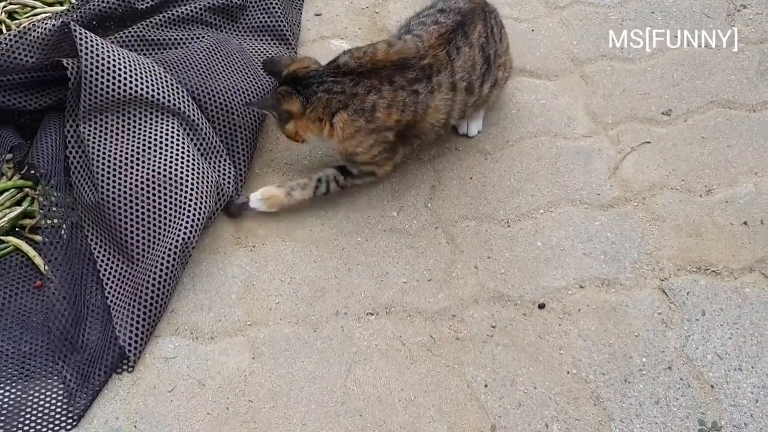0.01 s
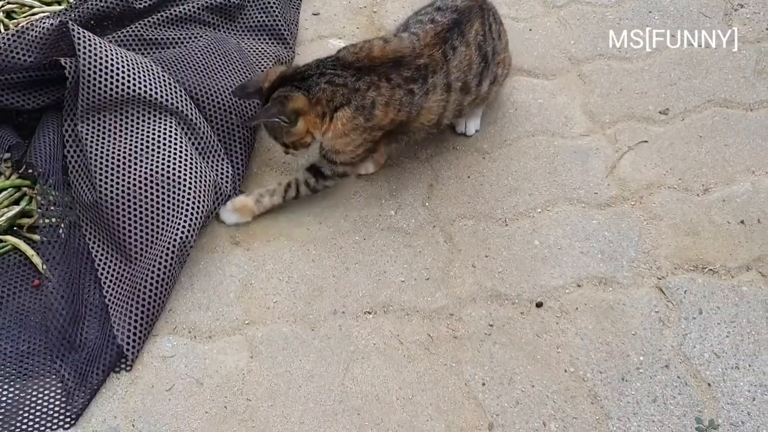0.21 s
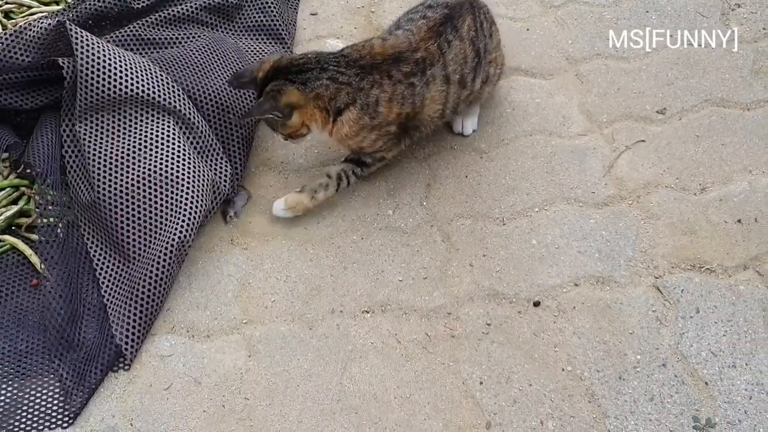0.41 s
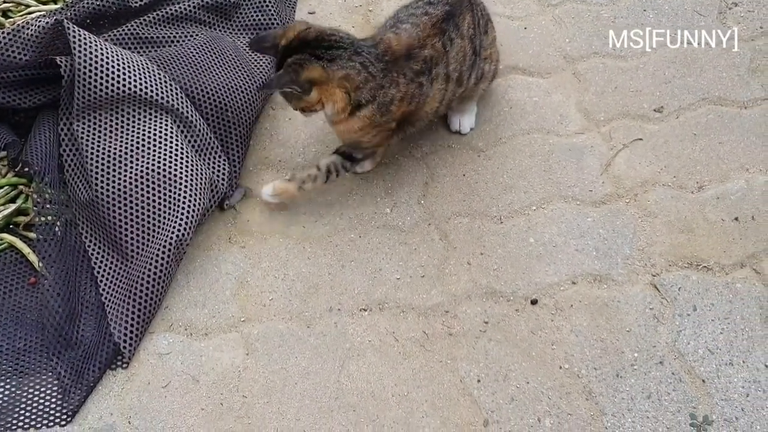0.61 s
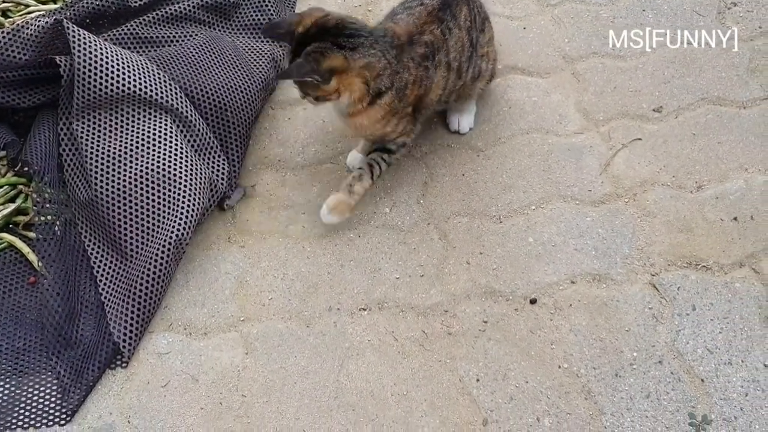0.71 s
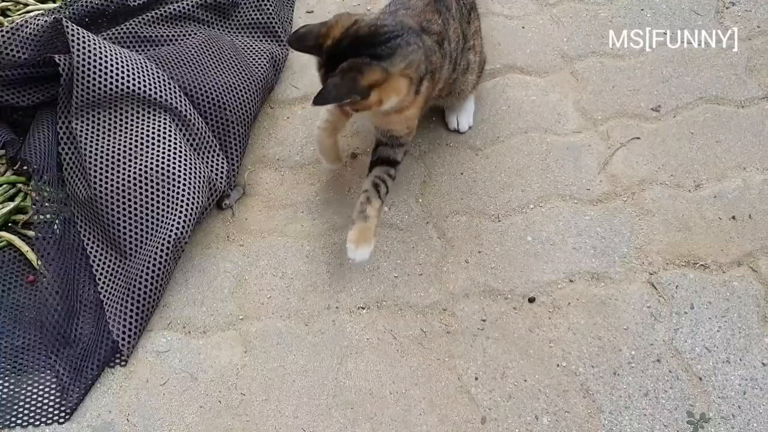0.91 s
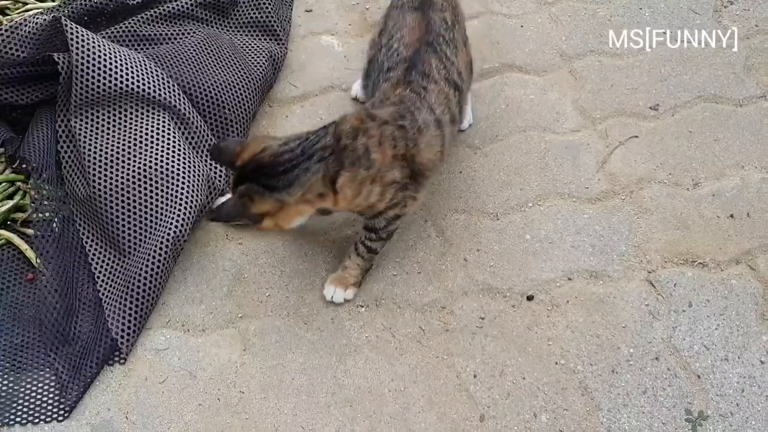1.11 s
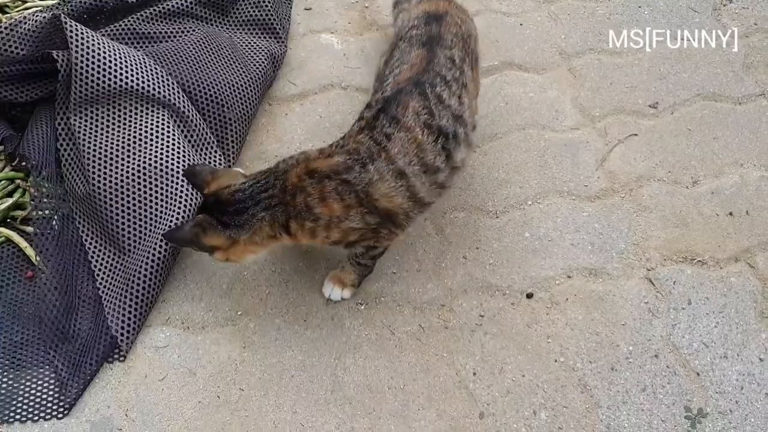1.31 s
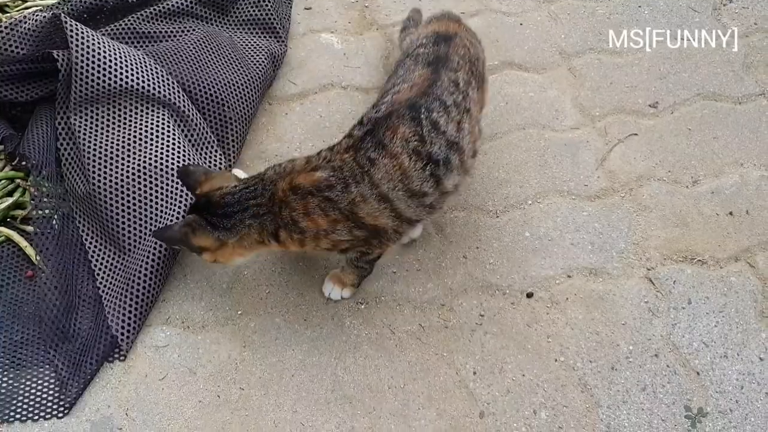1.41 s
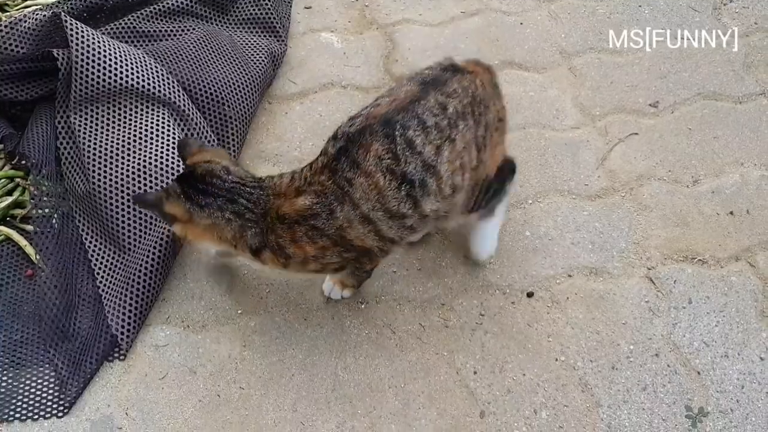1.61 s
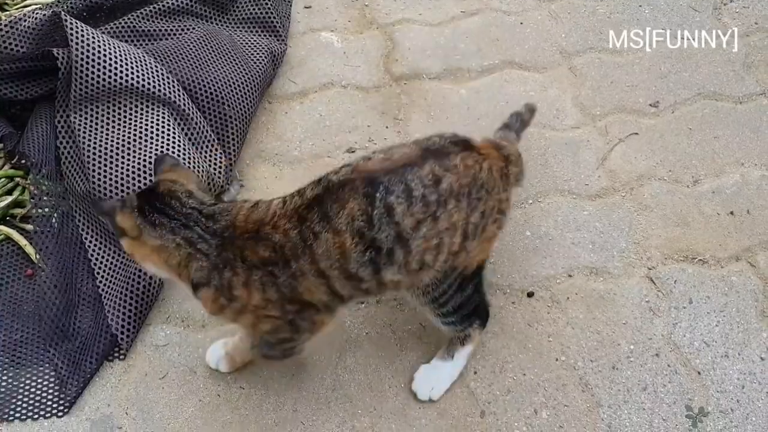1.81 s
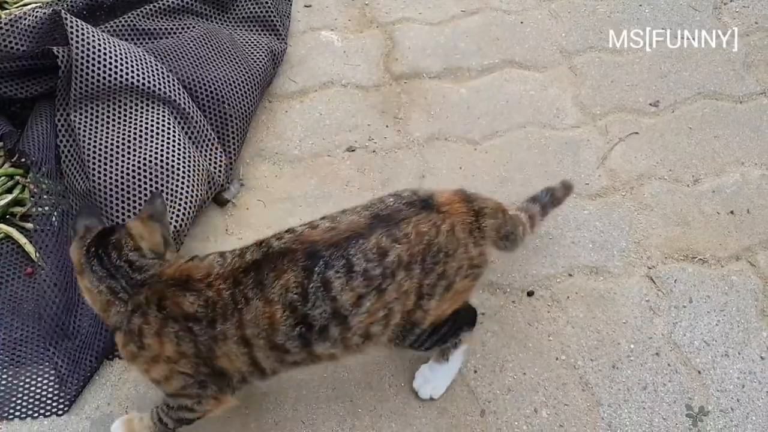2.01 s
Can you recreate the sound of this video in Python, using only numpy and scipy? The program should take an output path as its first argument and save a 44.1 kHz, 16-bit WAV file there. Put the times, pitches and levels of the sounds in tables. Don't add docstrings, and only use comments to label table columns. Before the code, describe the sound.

A mouse gives thin, extremely high trilling squeaks up close on a paved yard, distant traffic behind

```python
import sys
import numpy as np
from scipy import signal
from scipy.fft import rfft, irfft, next_fast_len
from scipy.io import wavfile
from scipy.ndimage import uniform_filter1d, map_coordinates

SR = 44100
rng = np.random.default_rng(int(sys.argv[2]) if len(sys.argv) > 2 else 0)


def store_wav(level_fs):
    pcm = np.round(np.clip(np.atleast_2d(level_fs), -1, 1) * 32767)
    wavfile.write(sys.argv[1], SR, pcm.T.astype(np.int16))


def to_linear_factor(level_db):
    exponent = np.asarray(level_db, float) / 20
    return 10 ** exponent


N = 92610
T = np.arange(N) / SR

# pitch_hz, level_db
RUMBLE_SPECTRUM = [(18, -38.5), (30, -11.5), (53, -2.5), (69, -2.5), (108, -9.5), (204, -4), (337, -18),
                   (377, -32), (600, -23.5), (780, -51.5), (1320, -120)]
# pitch_hz, level_db
AIR_SPECTRUM = [(240, -28), (400, -10), (518, -14.5), (768, -12.5), (2060, -17.5), (3450, -16), (3890, -16),
                (6510, -19), (15000, -19)]
# pitch_hz, likeness_0_to_1
SIDE_LIKENESS = [(30, .92), (100, 0.79), (180, 0.73), (350, 0.4), (800, 0), (8000, 0.055)]
# time_s, level_db
WIND_GUSTS = [(0.0, -54), (0.21, -42.5), (0.37, -46), (0.43, -36.5), (0.46, -48), (0.59, -38), (0.74, -62),
              (0.81, -39.5), (0.92, -58), (0.99, -44.5), (1.11, -55), (1.16, -46.5), (1.35, -55),
              (1.39, -40.5), (1.46, -39), (1.98, -46.5), (2.04, -37), (2.1, -53)]
# start_s, length_s, level_db, start_pitch_hz, end_pitch_hz
BIRD_CHIRPS = [
    (-.03, .22, -59, 3900, 4100),
    (.38, .12, -60, 3900, 4150),
    (.46, .14, -54.5, 3820, 3850),
    (.52, .07, -59, 4150, 4050),
    (.54, .1, -58, 4300, 4500),
    (.86, .135, -57.5, 3530, 3510),
    (1.85, .08, -60, 4200, 4200),
    (1.7, .13, -63, 4000, 4150),
    (2.0, .1, -61, 4050, 4000),
]
# start_s, length_s, level_db
BREATH_PUFFS = [
    (0.177, 0.046, -33.5),
    (.194, 0.0043, -29.5),
    (0.5405, 0.003, -31.5),
    (0.543, 0.0578, -41.5),
    (1.369, 0.064, -38.5),
    (1.405, 0.011, -41.5),
]
# pitch_hz, level_db
PUFF_SPECTRUM = [(3000, -31), (9000, -19.5), (11000, -1.5), (14000, 1.5), (15500, -17)]
# time_s, left_peak_db, right_peak_db, pitch_hz
FIRST_SQUEAKS = [
    [(.2005, -36, -34, 11500), (.202, -11, -20, 12050), (.2085, -12, -18, 12150), (.2105, -13, -12, 13300),
     (.22, -11, -10, 13500), (.234, -6, -7, 12950), (.24, -3.5, -7, 12880), (.242, 1.2, -6.5, 12930),
     (.258, .6, -4.5, 12660), (.271, -5, -6.5, 12620), (.2845, -8, -8, 13550), (.2905, -14, -14, 13050),
     (.293, -25, -24, 13300), (.3, -22, -22, 12350), (.3035, -36, -34, 12600)],
    [(.549, -34, -38, 11700), (.5505, -19, -23, 12400), (.552, -20, -24, 12650), (.555, -29, -33, 11900),
     (.557, -38, -35, 12700), (.559, -28, -23, 13300), (.5645, -24, -32, 12000)],
    [(.565, -34, -34, 14450), (.567, -15, -17, 14300), (.584, -16, -19, 14200), (.596, -14, -20, 13950),
     (.603, -13, -24, 13950), (.607, -13, -21, 14050), (.611, -12, -18, 13350), (.615, -9.5, -16, 13330),
     (.633, -13, -21, 13150), (.636, -28, -31, 13200), (.64, -21, -28, 13500), (.645, -32, -36, 13500),
     (.652, -36, -39, 13450)],
]
# time_s, left_peak_db, right_peak_db, pitch_hz
LAST_SQUEAKS = [
    [(1.371, -40, -42, 11900), (1.375, -16, -27, 11750), (1.381, -23, -29, 12000),
     (1.3865, -20, -27, 12100), (1.39, -30, -31, 10900), (1.392, -17, -27, 11800), (1.396, -23, -27, 12000),
     (1.3985, -32, -30, 11800), (1.4012, -10, -14, 12450), (1.404, -22, -22, 12200)],
    [(1.4035, -30, -26, 12100), (1.405, -14, -12, 12100), (1.412, -17, -20, 12350), (1.42, -20, -27, 11900),
     (1.423, -33, -34, 11300), (1.429, -34, -35, 11300)],
    [(1.4315, -36, -40, 11550), (1.434, -21, -36, 11500), (1.444, -18, -33, 11550),
     (1.454, -18, -38, 11570), (1.4635, -19, -32, 11850), (1.467, -20, -26, 13150),
     (1.4735, -17, -20, 12650), (1.4755, -27, -28, 13200), (1.48, -24, -25, 12750),
     (1.484, -40, -41, 12700)],
    [(1.4, -22, -24, 13900), (1.41, -34, -36, 13700)],
]
# (dip_db softens each pitch top, or each pitch low if negative)
SQUEAK_TRILLS = [
    (.2635, 118, 60, .6, .25),
    (.555, 120, 60, 1, -.6),
    (.6155, 119, 260, 7, 1.3),
    (1.3755, 120, 60, 7, 1.7),
    (1.4075, 120, 90, 3, -.8),
    (1.4465, 119, 210, -6, 1.3),
    (1.4, 300, 150, 6, 1.1),
]
# time_s, level_db
PAW_TAPS = [
    (0.207, -30),
    (.553, -23.5),
]
# start_s, length_s, level_db, pitch_hz
SOFT_HOOT = (.868, .08, -52, 380)
# start_s, length_s, level_db, top_pitch_hz, tilt_db_per_order
FAR_CALLS = [
    (1.057, 0.145, -49, 326.2, -2),
    (1.225, 0.065, -60, 322, 0),
    (1.875, .195, -47.5, 318, 3),
]
# multiple_of_pitch, level_db
CALL_OVERTONES = [(3, -22), (4, -7.5), (5, 0), (6, -13), (7, -22)]
# pitch_hz, level_db
RATTLE_SPECTRUM = [(100, 1), (800, 2), (3000, -2.5), (10000, -3), (11500, -30)]
# start_s, length_s, centre_hz, width_hz
BAND_GAPS = [(.275, .04, 11200, 1300), (.33, .12, 2920, 70), (.49, .03, 2980, 150), (.55, .085, 5100, 600),
             (.55, .1, 3220, 170), (.55, .035, 2750, 200), (.55, .03, 6000, 700), (.575, .05, 7350, 250),
             (.81, .07, 2800, 100), (.885, .03, 4000, 250), (.935, .075, 1620, 130), (1.09, .03, 6050, 250),
             (1.385, .045, 5800, 350), (1.385, .04, 5250, 250), (1.385, .04, 4050, 250),
             (1.385, .05, 3250, 250), (1.435, .06, 2950, 400), (1.45, .065, 5050, 450),
             (1.46, .035, 3500, 250), (1.505, .035, 5450, 500), (1.5, .045, 1600, 170)]


def unit(x):
    return x / np.sqrt(np.mean(x ** 2) + 1e-20)


def along(points, hz):
    f, v = np.transpose(points)
    return np.interp(np.log(hz + 1), np.log(f + 1), v)


def wobble(rate):
    knots = rng.standard_normal(int(N * rate / SR) + 4)
    return map_coordinates(knots, [T * rate])


def filtered(x, response):
    m = next_fast_len(N + 8192)
    return irfft(rfft(x, m) * response(np.fft.rfftfreq(m, 1 / SR)), m)[..., :N]


def swell(start, length, edge):
    u = (T - start) / length
    return np.sin(np.pi / 2 * np.clip(np.minimum(u, 1 - u) / edge, 0, 1)) ** 2


def tone(hz):
    return np.sqrt(2) * np.sin(2 * np.pi * np.cumsum(hz) / SR)


def sides(x, pan_db):
    left = 1 / (1 + to_linear_factor(-pan_db))
    return 2 * x * np.array([left + 0 * x, 1 - left + 0 * x])


def echoes(x, t60):
    t = T[:SR // 2]
    build_up = 1 - np.exp(-t / 0.0025)
    tail = rng.standard_normal((2, len(t))) * to_linear_factor(-60 * t / t60) * build_up
    return signal.fftconvolve(x[None], tail / np.linalg.norm(tail[0]), axes=1)[:, :N]


def rush(spectrum, patchy_db):
    z = signal.stft(rng.standard_normal((2, N)), nperseg=512)[2]
    field = rng.standard_normal(z.shape[1:])
    field = uniform_filter1d(field, size=6, axis=0)
    field = uniform_filter1d(field, size=14, axis=1)
    pair = signal.istft(z * to_linear_factor(patchy_db * unit(field)), nperseg=512)[1][:, :N]

    def mid_and_side(hz):
        turn = np.arccos(np.clip(along(SIDE_LIKENESS, hz), -1, 1)) / 2
        return to_linear_factor(along(spectrum, hz)) * [np.cos(turn), np.sin(turn)]

    mid, side = filtered(pair, mid_and_side)
    return np.array([mid + side, mid - side]) / np.std(mid)


def narrow_noise(centre_hz, width_hz):
    noise = rng.standard_normal(N)
    return unit(filtered(noise, lambda hz: 1 / (1 + ((hz - centre_hz) / width_hz) ** 2)))


def background():
    gust_db = np.interp(T, *np.transpose(WIND_GUSTS))
    drone = to_linear_factor(-1 + gust_db) * sides(narrow_noise(68.2, 18), 0.91)
    hum = to_linear_factor(-56) * narrow_noise(202, 20)
    rumble_db = -44 + 0.36 * (gust_db - gust_db.mean()) + 0.63 * wobble(12.04)
    rumble = to_linear_factor(rumble_db) * rush(RUMBLE_SPECTRUM, patchy_db=2.5)
    rumble = rumble * to_linear_factor([[.6], [-.6]])
    air = to_linear_factor(-51.5 + .3 * wobble(0.71)) * rush(AIR_SPECTRUM, patchy_db=.8)
    return hum + rumble + drone + air


def birds():
    x = np.zeros(N)
    for s, length, db, start_hz, end_hz in BIRD_CHIRPS:
        glide = np.interp(T, [s, s + length], [start_hz, end_hz])
        chirp = tone(glide + 60 * wobble(150))
        flutter = to_linear_factor(3 * wobble(80))
        x += to_linear_factor(db) * swell(s, length, .3) * chirp * flutter
    return .8 * sides(x, 2) + .6 * echoes(x, .25)


def squeak(rows, trill):
    low_s, rate, depth_hz, dip_db, lead = trill
    s, *cols = np.transpose(rows)
    left_db, right_db, pitch_hz = [uniform_filter1d(np.interp(T, s, c), size=45) for c in cols]
    turn = 2 * np.pi * rate * (T - low_s)
    depth = depth_hz * np.where(T > s[0] + .03, 1.45, 1)
    jitter_hz = 20 * wobble(350)
    phase = 2 * np.pi * np.cumsum(pitch_hz - depth * np.cos(turn) + jitter_hz) / SR
    lead = lead + .15 * wobble(100)
    whistle = np.sin([phase + lead / 2, phase - lead / 2])
    dip = abs(dip_db) * np.maximum(-np.sign(dip_db) * np.cos(turn), 0) ** 3
    fade = swell(s[0] - .001, s[-1] - s[0] + 0.0022, 0.047)
    size = fade * to_linear_factor(np.array([left_db, right_db]) - dip)
    flutter = to_linear_factor(.25 * np.array([wobble(250), wobble(250)]))
    breath = to_linear_factor(-34) * wobble(2200)
    return size * whistle * (flutter + breath)


def puffs():
    noise = rng.standard_normal((2, N))
    hiss = unit(filtered(noise, lambda hz: to_linear_factor(along(PUFF_SPECTRUM, hz))))
    size = sum(to_linear_factor(db) * swell(s, length, 0.14) for s, length, db in BREATH_PUFFS)
    return hiss * to_linear_factor(3.75 * wobble(500)) * size


def mouse():
    out = puffs()
    for rows, trill in zip(FIRST_SQUEAKS + LAST_SQUEAKS, SQUEAK_TRILLS):
        out += squeak(rows, trill)
    return out + to_linear_factor(-34) * echoes(out.mean(0), .1)


def taps():
    x = np.zeros(N)
    t = T[:SR // 20]
    for s, db in PAW_TAPS:
        push = np.sin(2 * np.pi * 110 * t) * to_linear_factor(-60 * t / 0.037)
        tick = 0.34 * rng.standard_normal(len(t)) * to_linear_factor(-60 * t / 0.0028)
        x[round(s * SR):][:len(t)] += to_linear_factor(db) * (push + tick)
    return sides(x, 1)


def far_calls():
    s, length, db, hz = SOFT_HOOT
    x = to_linear_factor(db) * swell(s, length, 0.092) * tone(hz + 6 * wobble(30.2))
    for s, length, db, top_hz, tilt_db in FAR_CALLS:
        u = np.clip((T - s) / length, 0, 1)
        arch = 1 - .13 * (2 * u - 1) ** 4
        pitch = top_hz * arch * (1 + 0.0045 * wobble(60))
        voice = np.zeros(N)
        for k, level in CALL_OVERTONES:
            roughness = 1 + .2 * wobble(90) + .3 * wobble(400)
            voice += to_linear_factor(level + tilt_db * (k - 5)) * tone(k * pitch) * roughness
        x += to_linear_factor(db) * swell(s, length, 0.15) * (.75 + .4 * np.sin(np.pi * u)) * voice
    direct = np.array([np.roll(x, 8), x])
    return .8 * direct + to_linear_factor(-12) * echoes(x, .4)


def starved(x, loudness):
    hz, t, z = signal.stft(x, SR, nperseg=1024)
    busy = np.interp(t, T, loudness.mean(0))
    share = np.where((busy > .01) & (busy < .12), .12, .015)
    lot = rng.random((len(hz), len(t)))
    lot = lot[np.arange(len(hz)) // 6][:, np.arange(len(t)) // 4]
    middle = (hz > 1200) & (hz < 6500)
    dropped = (lot < share) & middle[:, None]
    x = signal.istft(z * ~dropped, SR, nperseg=1024)[1][:, :N]
    for s, length, centre, width in BAND_GAPS:
        band = filtered(x, lambda hz: np.abs(hz - centre) < .6 * width)
        x = x - swell(s - .008, length + .016, .12) * band
    return x


def scene():
    return background() + birds() + mouse() + taps() + far_calls()


def low_pass(x):
    return signal.sosfilt(signal.butter(12, 15480, fs=SR, output="sos"), x)


def record(dry):
    treble = filtered(dry, lambda hz: hz > 10000)
    loudness = np.sqrt(np.abs(uniform_filter1d(treble ** 2, size=900, axis=1)))
    noisy = dry + to_linear_factor(-39.5) * loudness ** 0.52 * rush(RATTLE_SPECTRUM, patchy_db=2.5)
    top, hardness = .92, 70
    clipped = noisy / (1 + np.abs(noisy / top) ** hardness) ** (1 / hardness)

    def pass_band(hz):
        low_cut = np.clip(hz / 40, 0, 1) ** 3
        return low_cut / (1 + np.exp(np.clip((hz - 14600) / 80.5, -40, 40)))

    mix = starved(filtered(clipped, pass_band), loudness)
    return low_pass(mix)


dry = scene()
out = record(dry)
store_wav(out)
```